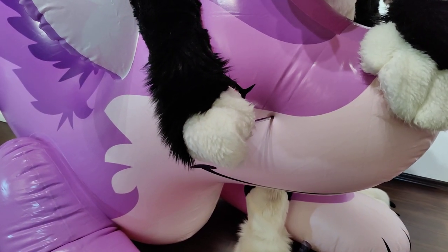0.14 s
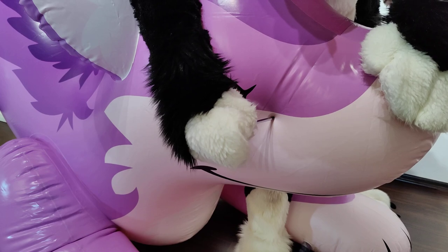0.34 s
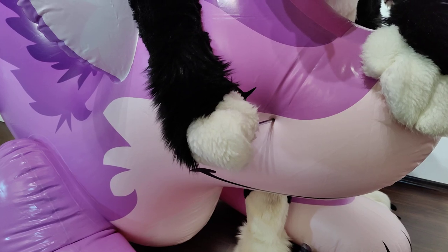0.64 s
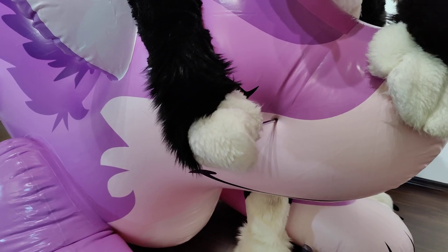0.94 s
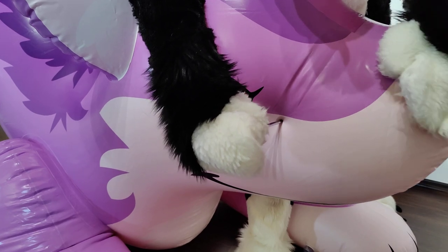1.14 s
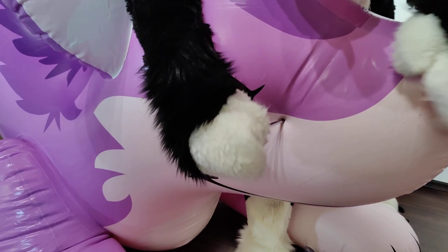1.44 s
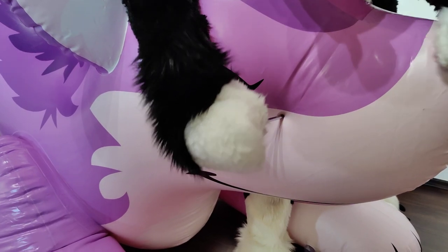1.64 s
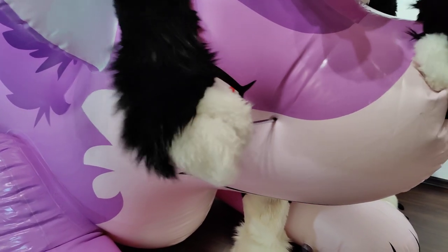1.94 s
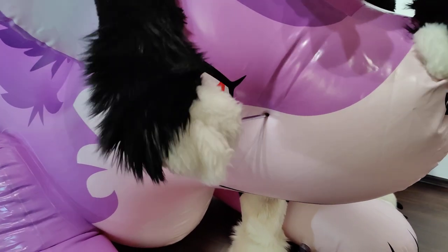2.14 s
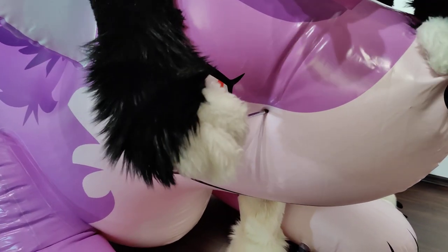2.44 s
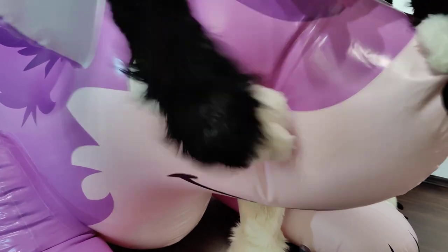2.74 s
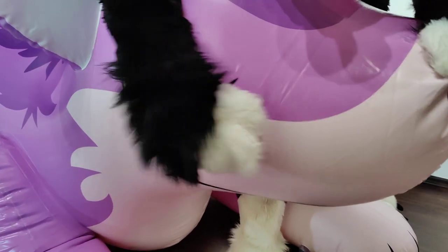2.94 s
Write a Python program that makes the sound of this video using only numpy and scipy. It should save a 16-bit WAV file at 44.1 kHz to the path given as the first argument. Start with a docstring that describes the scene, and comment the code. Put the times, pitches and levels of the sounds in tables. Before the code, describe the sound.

A big inflatable vinyl toy is squeezed close to the microphone in a small room. For the first two seconds it buckles with soft thuds and crinkles while fur rubs and scuffs over it. From about 2 to 2.5 seconds comes a faint, rough squeak with hollow knocks. Near 2.9 seconds a paw slaps the toy loudly, and it booms with a wavering ring.

```python
"""A small room: furry costume paws squeeze a big inflatable vinyl toy close to the microphone.
Fur rubs, scuffs and squeaks over the skin, which buckles with soft thuds, crinkles, and slips
with hollow knocks. At the end a paw slaps the toy: it booms, and its ring bends up and down
as the skin tightens and slackens."""
import sys
import numpy as np
from scipy import signal
from scipy.fft import rfft, irfft, next_fast_len
from scipy.io import wavfile
from scipy.ndimage import map_coordinates

SR = 44100
rng = np.random.default_rng(int(sys.argv[2]) if len(sys.argv) > 2 else 0)


def put_to_file(sound):
    """Save the sound as 16-bit audio at rate SR, in the file named by the first command-line argument."""
    columns = np.atleast_2d(sound).T  # one column per channel
    safe = np.clip(columns, -1, 1)
    whole_steps = np.round(safe * 32767)
    wavfile.write(sys.argv[1], SR, whole_steps.astype(np.int16))


N = 136710
TIME_S = np.arange(N) / SR
EVENT_N = SR // 2
AGE_S = TIME_S[:EVENT_N]  # time within one event
LEAD_S = .005  # pulse start to pulse centre
FLUTTER_HZ, GRIP_HZ = 32, 430  # rates of change: rubbing pressure; skin grip and flapping


def amp(db):
    """Decibels to gain."""
    return 10 ** (np.asarray(db) / 20)


def unit(x):
    """Scale to rms 1."""
    return x / np.sqrt(np.mean(x ** 2) + 1e-20)


def along(points, hz):
    """Interpolate (frequency [Hz], value) points on a log axis."""
    knots_hz, values = np.transpose(points)
    return np.interp(np.log(hz + 1), np.log(knots_hz + 1), values)


def curves(rows):
    """One per-sample curve for each column after the time."""
    times_s, *columns = np.transpose(rows)
    return [np.interp(TIME_S, times_s, column) for column in columns]


def wobble(rate_hz):
    """Smooth random curve, rate_hz knots a second."""
    return map_coordinates(rng.standard_normal(int(N * rate_hz / SR) + 4), [TIME_S * rate_hz])


def fade(t60_s, age_s=AGE_S):
    """Exponential decay, 60 dB in t60_s."""
    return np.exp(-np.log(1000) * age_s / t60_s)


def add(out, start_s, x):
    """Mix x into out from start_s."""
    i = max(round(start_s * SR), 0)
    out[:, i:i + x.shape[-1]] += x[..., :N - i]


def filtered(x, response):
    """Apply the gain response(hz) by FFT."""
    size = x.shape[-1]
    padded = next_fast_len(size + SR // 4)
    return irfft(rfft(x, padded) * response(np.fft.rfftfreq(padded, 1 / SR)), padded)[..., :size]


def diffuse(pair, colour):
    """Colour two unrelated signals and spread them as the room does, rms 1."""
    # room sound field (frequency [Hz], left-right coherence [ratio])
    coherence = [(100, 0.96), (300, 0.92), (650, 0.57), (1300, 0.044), (3000, 0.041), (8000, 0.035)]

    def mid_side_gains(hz):
        angle = np.arccos(np.clip(along(coherence, hz), -1, 1)) / 2
        return amp(along(colour, hz)) * [np.cos(angle), np.sin(angle)]

    mid, side = filtered(pair, mid_side_gains)
    return unit(np.array([mid + side, mid - side]))


def noise(colour, size=EVENT_N):
    """Diffuse noise; colour is (frequency [Hz], level [dB])."""
    return diffuse(rng.standard_normal((2, size)), colour)


def friction(colour, slips_per_s, smooth):
    """Tiny random slips over smooth noise."""
    slips = (rng.random(N) < slips_per_s / SR) * rng.standard_normal((2, N))
    return diffuse(unit(slips) + smooth * rng.standard_normal((2, N)), colour)


def push(sigma_ms, rebound, rebound_s):
    """Gaussian pressure pulse centred at LEAD_S, then a soft swing back."""
    offset_s = AGE_S - LEAD_S
    pulse = np.exp(-.5 * (offset_s / (sigma_ms / 1000)) ** 2)
    swing = np.maximum(offset_s, 0) / rebound_s
    return pulse - rebound * (swing * np.exp(1 - swing)) ** 2


def room_rumble():
    """Quiet, steady low noise of the room."""
    # room spectrum (frequency [Hz], level [dB])
    colour = [(25, 5), (80, -17), (150, -29), (500, -36), (1100, -28), (1800, -53), (7000, -53.5)]
    return amp(-51) * noise(colour, N)


def sway():
    """The toy's weight shifts under the paws with a deep, slow flutter of air."""
    # air movement (time [s], level [dB])
    levels = [(0, -67), (.7, -46.5), (.97, -50), (1.04, -37.5), (1.4, -64), (1.9, -37), (2.15, -50),
              (2.35, -43.5), (2.7, -51)]
    sway_db, = curves(levels)
    return amp(sway_db) * noise([(15, -13.5), (30, -2), (50, -17.5), (110, -26.5), (1000, -88)], N)


def rubbing():
    """Fur hisses on the vinyl; the skin rumbles under it."""
    # fur hiss, skin rumble (time [s], level [dB])
    hiss_levels = [(0, -68.5), (.2, -65.5), (.3, -77.5), (.51, -78), (.55, -69.5), (.72, -72.5),
                   (.82, -77.5), (.99, -77), (1.05, -56), (1.11, -66), (1.27, -64), (1.44, -59.5),
                   (1.51, -55), (1.6, -61), (1.67, -68), (1.93, -69.5), (2.07, -61.5), (2.2, -70.5),
                   (2.6, -76)]
    rumble_levels = [(0, -47.5), (.2, -46.5), (.4, -62.5), (.56, -51.5), (.7, -45), (.82, -54), (.97, -61),
                     (1.08, -42), (1.28, -45), (1.5, -40), (1.75, -51.5), (1.95, -60), (2.2, -35),
                     (2.4, -54), (2.66, -60.5), (2.83, -47)]
    # their spectra (frequency [Hz], level [dB])
    hiss_colour = [(200, -3), (900, 20), (1700, 6), (3200, 10), (5000, 2.5), (7000, -1.5), (8600, 3),
                   (12000, -4), (14000, -3)]
    rumble_colour = [(30, 2), (65, -9.5), (130, -1.5), (210, -5), (370, -5.5), (560, -14.5), (950, -18),
                     (1300, -26), (2000, -35.5), (4400, -48.5)]
    hiss_db = curves(hiss_levels)[0] + 4.5 + 2.6 * wobble(FLUTTER_HZ)
    hiss = amp(hiss_db) * friction(hiss_colour, slips_per_s=4200, smooth=1.2)
    rumble_db = curves(rumble_levels)[0] + wobble(FLUTTER_HZ)
    return hiss + amp(rumble_db) * friction(rumble_colour, slips_per_s=1800, smooth=.98)


def forearm_slide():
    """Friction of the forearm sliding under pressure."""
    # slide (time [s], level [dB])
    levels = [(1.5, -100), (1.66, -63), (1.93, -54.5), (2.02, -46), (2.2, -46), (2.3, -54), (2.44, -54),
              (2.7, -75)]
    # slide spectrum (frequency [Hz], level [dB])
    colour = [(150, 6), (500, 2), (950, 3), (1350, -6.5), (2100, -7), (3200, -11.5), (5000, -21),
              (14000, -44)]
    slide_db = curves(levels)[0] + wobble(FLUTTER_HZ)
    return amp(slide_db) * friction(colour, slips_per_s=4000, smooth=1.6)


def squeak():
    """The sliding arm's uneven grip gives a rough, airy squeak."""
    # squeak path (time [s], pitch [Hz], level [dB])
    path = [(1.96, 1714, -60), (2.18, 1908, -56.5), (2.28, 1804, -67), (2.40, 1820, -66), (2.46, 1600, -65),
            (2.53, 1450, -110)]
    hz, db = curves(path)
    grip = np.array([wobble(GRIP_HZ) + 1j * wobble(GRIP_HZ) for channel in range(2)])
    band = unit((grip * np.exp(2j * np.pi * np.cumsum(hz) / SR)).real)
    return amp(db + 1.5 * wobble(FLUTTER_HZ)) * band * (TIME_S > path[0][0])


def chirps():
    """Where the arm grips evenly, the squeak becomes a short, clear, wavering tone."""
    # catches (time [s], pitch [Hz], level [dB])
    catches = [(2.075, 1892, -57), (2.183, 1780, -52.5), (2.203, 1950, -57), (2.315, 1810, -58),
               (2.377, 1790, -57), (2.427, 1730, -60)]
    sigma_s = .0088
    out = np.zeros((2, N))
    for time_s, hz, db in catches:
        phase = 2 * np.pi * np.cumsum(hz * (1 + .018 * wobble(2 * FLUTTER_HZ))) / SR
        envelope = np.exp(-.5 * ((TIME_S - time_s) / sigma_s) ** 2)
        out += amp(db) * envelope * np.sin(phase + .5 * rng.standard_normal((2, 1)))
    return out


def fur_flicks():
    """Tufts of fur flick brightly off the skin."""
    # flicks (time [s], level [dB])
    flicks = [(1.252, -48.5), (1.9615, -55)]
    colour = [(2000, -25), (6000, -15), (9000, -3), (14000, 3)]
    out = np.zeros((2, N))
    for time_s, db in flicks:
        add(out, time_s, amp(db) * noise(colour) * fade(.028))
    return out


def bright_bursts():
    """Short, bright bursts on the vinyl: paw scuffs, a crease's sharp top, snaps of the slapped skin."""
    # bursts (time [s], level [dB])
    bursts = [(1.032, -44), (1.16, -46.5), (1.433, -46.5), (1.507, -48), (1.973, -43.5), (2.877, -32),
              (2.888, -26), (2.906, -25)]
    # burst spectrum (frequency [Hz], level [dB])
    colour = [(500, 3.5), (4200, -2.5), (7000, -16.5), (14000, -11)]
    out = np.zeros((2, N))
    for time_s, db in bursts:
        add(out, time_s, amp(db) * noise(colour) * fade(.039) * (1 - fade(.019)))
    return out


def crinkles():
    """Creases snap with a short crack and a faint room tail."""
    # snaps (time [s], level [dB])
    snaps = [(.125, -40), (0.308, -44), (.319, -49), (0.509, -36.5), (.522, -43), (.618, -41.5),
             (.702, -42.5), (0.857, -51), (1.013, -32), (1.805, -44), (1.974, -30.5)]
    # snap spectrum (frequency [Hz], level [dB])
    colour = [(150, 13), (600, -1), (1300, 3.5), (1650, -9), (2200, -7.5), (3300, -17.5), (5000, -36.5),
              (14000, -46)]
    crack = fade(.022) * (1 - fade(.003))
    room_tail = amp(-16) * fade(.27)
    out = np.zeros((2, N))
    for time_s, db in snaps:
        add(out, time_s, amp(db + 2) * noise(colour) * (crack + room_tail))
    return out


def thuds():
    """The skin buckles in one dull pulse that rattles round the air chamber."""
    # buckles (time [s], level [dB], nominal width [ms], rattle trim [dB])
    buckles = [(.005, -32, 2.6, 4.5), (.126, -36.5, 2.4, 11), (.172, -29.5, 2.5, 3), (.208, -31.5, 3.4, -1),
               (0.306, -36, 2.4, 3.5), (.512, -31.5, 2.1, 9), (.638, -28.5, 1.8, 3.5),
               (0.6725, -22.5, 0.98, -4), (.703, -28.5, 1.23, 4.5), (0.9985, -26.5, 0.86, 2.5),
               (1.010, -15, 1.01, -1.5), (1.665, -17.5, 1.01, -6), (1.6819, -22, 0.86, -7),
               (1.78, -29, 1.46, -10.5), (1.8071, -32.5, 1.1, 0.5), (1.8674, -20, 1.44, -5),
               (1.945, -25.5, 1.03, -2), (1.976, -22, 1.85, -3), (2.281, -24.5, 1.4, -9),
               (2.391, -31.5, 2.6, -0.5), (2.4661, -23, 1.52, -6), (2.562, -33, 2.2, 1.5),
               (2.7859, -27, 1.5, -15)]
    # chamber spectrum (frequency [Hz], level [dB])
    colour = [(25, -1.5), (60, 4.5), (110, 4.5), (220, 1), (400, -8), (700, -16.5), (1100, -21),
              (2000, -34.5), (6000, -67)]
    out = np.zeros((2, N))
    for time_s, db, width_ms, trim_db in buckles:
        add(out, time_s - LEAD_S, -amp(db) * push(.58 * width_ms, rebound=.35, rebound_s=.0025))
        rattle = noise(colour) * fade(.29) * (1 - fade(.048))
        add(out, time_s, amp(db + trim_db - 10.5) * rattle)
    return out


def knocks():
    """Each paw slip taps the taut skin and rings its modes, detuned by a random stretch."""
    # slips (time [s], level [dB])
    slips = [(.665, -35), (1.658, -29), (1.855, -31.5), (2.174, -15.5), (2.196, -25), (2.209, -19),
             (2.228, -25.5), (2.503, -27), (2.597, -30), (2.696, -38.5), (2.752, -32), (2.92, -8.5)]
    # skin modes (frequency [Hz], level [dB], t60 [s])
    modes = [(285.5, -2, 0.12), (335, -2.5, 0.063), (496.2, -2.5, 0.14), (555, -9, 0.19),
             (946, -12.5, 0.16)]
    # hollow tap spectrum (frequency [Hz], level [dB])
    colour = [(100, 22), (300, 3.5), (560, 10.5), (1000, -5), (1400, -31), (6000, -48)]
    low_pass = signal.butter(6, 1150, fs=SR, output="sos")
    out = np.zeros((2, N))
    for time_s, db in slips:
        stretch = 1 + .025 * rng.standard_normal()
        ring = np.zeros(EVENT_N)
        for hz, mode_db, t60_s in modes:
            gain = amp(mode_db + 2 * rng.standard_normal())
            ring += gain * np.cos(2 * np.pi * hz * stretch * AGE_S) * fade(t60_s)
        tap = noise(colour) * (fade(.03) + amp(-14) * fade(.24))
        knock = amp(db) * (amp(-13.5) * ring + amp(-6.5) * tap)
        add(out, time_s, signal.sosfilt(low_pass, knock))
    return out


def skin_ring(start_s):
    """The slapped skin rings; its pitch follows the tension as the toy heaves."""
    # stretched skin modes (frequency [Hz], level [dB], t60 [s])
    modes = [(177.5, -15, 0.39), (263.3, -7, 0.3), (558, -15, 0.54), (631, -18, 0.43), (800, -26, 0.63),
             (1007, -24, 0.21)]
    tightest_s, heave_period_s, bend_depth = 2.972, .18, .161
    bend = 1 + bend_depth * np.cos(2 * np.pi * (start_s + AGE_S - tightest_s) / heave_period_s)
    ring = np.zeros((2, EVENT_N))
    for hz, db, t60_s in modes:
        phase = 2 * np.pi * (hz * np.cumsum(bend) / SR + rng.random())
        jitter = .5 * wobble(80.2)[:EVENT_N]
        stereo_shift = hz / 1200 * rng.standard_normal((2, 1))
        ring += amp(db) * np.sin(phase + jitter + stereo_shift) * fade(t60_s)
    return ring * (1 - fade(.25))


def skin_flap():
    """The slapped skin flaps; its noise holds briefly, then dies away band by band."""
    # flap spectrum (frequency [Hz], level [dB])
    colour = [(30, -14), (60, -6), (100, 0.5), (135, -24), (260, -9), (400, -13), (650, -18), (1000, -18.5),
              (1800, -34), (3000, -36.5), (7500, -52.5), (14000, -55)]
    # flap decay (frequency [Hz], t60 [s])
    decay_times = [(60, 0.44), (500, 0.57), (3000, 0.57), (12000, 0.56)]
    hold_s = .039
    hz, frame_s, bands = signal.stft(noise(colour), SR, nperseg=256)
    decay = fade(along(decay_times, hz)[:, None], np.maximum(frame_s - hold_s, 0))
    _, tail = signal.istft(bands * decay, SR, nperseg=256)
    flapping = amp(1.2 * wobble(GRIP_HZ))[:EVENT_N]
    return flapping * tail[:, :EVENT_N] * (1 - fade(.064))


def slap():
    """A paw slaps with a crack and a shove; the whole toy bounces, its skin rings and flaps."""
    # slap and shove pulses (time [s], level [dB], sigma [ms])
    pulses = [(2.8738, -2.5, 0.38), (2.9029, -6, 0.83), (2.9080, -11, 0.71)]
    # bounce modes (frequency [Hz], level [dB], t60 [s])
    modes = [(27.06, -16, 1.5), (53.08, -18.5, 1.28), (89.6, -29, 0.52)]
    start_s = pulses[0][0]
    out = np.zeros((2, N))
    for time_s, db, sigma_ms in pulses:
        add(out, time_s - LEAD_S, amp(db) * push(sigma_ms, rebound=.058, rebound_s=.0081))
    crack = noise([(200, -2), (900, 0), (2000, -13), (6000, -22), (14000, -25)]) * fade(.012)
    add(out, start_s - .0016, amp(-12.5) * crack)
    boom = -sum(amp(db) * np.sin(2 * np.pi * hz * AGE_S) * fade(t60_s) for hz, db, t60_s in modes)
    add(out, start_s, boom + skin_ring(start_s) + amp(-17.5) * skin_flap())
    return out


def scene():
    """The toy over the quiet rumble of the room."""
    hits = thuds() + crinkles() + fur_flicks() + bright_bursts() + knocks() + slap()
    sliding = rubbing() + forearm_slide() + squeak() + chirps()
    return hits + sliding + sway() + room_rumble()


def record(dry):
    """The left microphone is duller than the right; a steep cut limits the band."""
    # microphone balance (frequency [Hz], left minus right [dB])
    balance = [(200, 0), (700, -.5), (2000, -1.3), (4400, -3.5), (9000, -3), (11500, 0), (13500, -12)]
    cutoff_hz = 14400
    split = np.array([[.5], [-.5]])
    return filtered(dry, lambda hz: amp(along(balance, hz) * split) / (1 + (hz / cutoff_hz) ** 100))


dry = scene()
out = record(dry)
put_to_file(out)
```